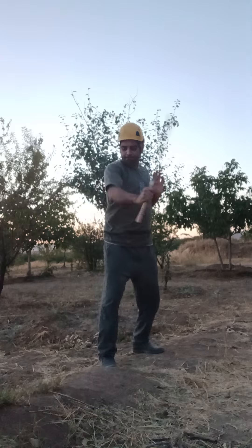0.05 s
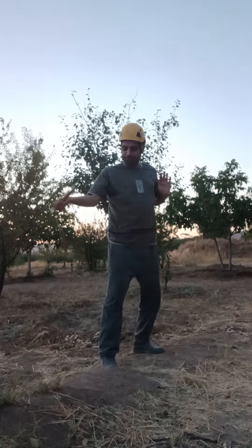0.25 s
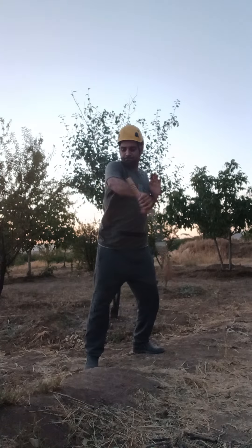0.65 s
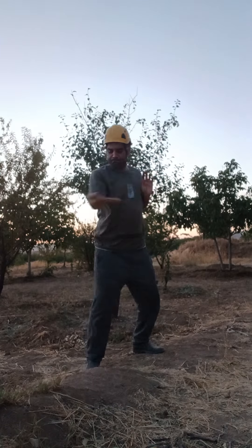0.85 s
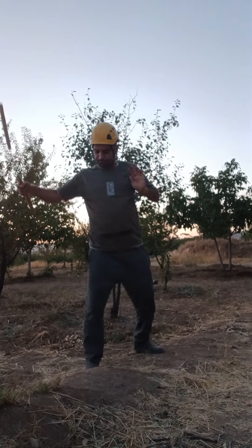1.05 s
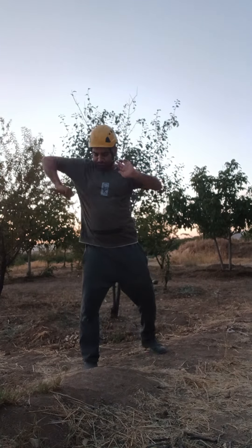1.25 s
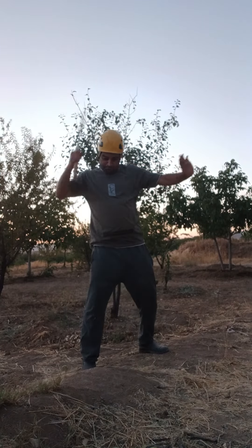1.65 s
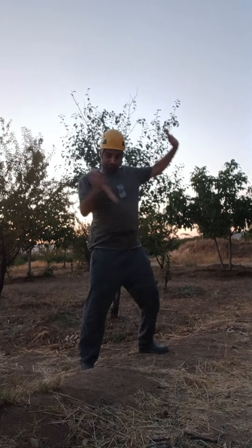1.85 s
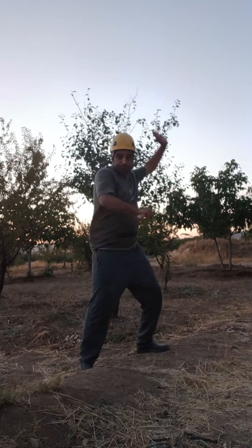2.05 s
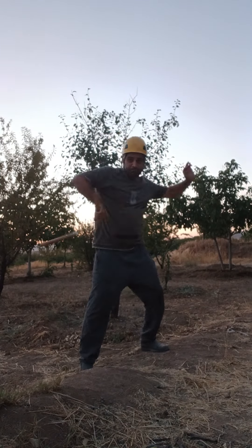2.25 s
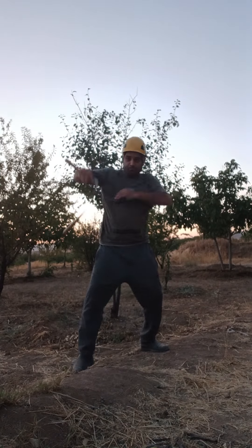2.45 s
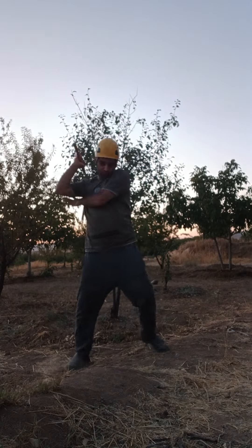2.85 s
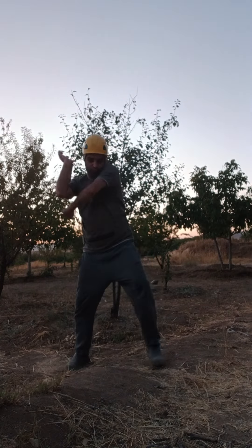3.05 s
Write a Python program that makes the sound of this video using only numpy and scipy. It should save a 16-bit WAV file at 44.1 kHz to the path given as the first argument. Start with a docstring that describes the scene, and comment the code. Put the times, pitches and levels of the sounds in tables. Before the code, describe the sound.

Short, uneven clacks and chain rattles come from a nunchaku being swung in the open air, with faint swishes as the sticks pass. Low wind buffets the microphone from side to side, then drops as the clacking ends.

```python
"""A nunchaku is swung and caught on dry ground outdoors. From the start, air hisses softly, a light
wind buffets each microphone port (opening) in turn, and the chain rattles. At once the sticks begin
to clack, each hit making them ring briefly, and a far insect starts chirping. Around half a second in,
the sticks swish through the air and the chain scrapes over one. At 1.4 s air whooshes across the right
port. The clacks go on until about 3 s, when the wind drops and a faint steady tone sounds."""
import sys
import numpy as np
from scipy import signal
from scipy.fft import rfft, irfft
from scipy.io import wavfile
from scipy.ndimage import uniform_filter1d

SR = 44100
rng = np.random.default_rng(int(sys.argv[2]) if len(sys.argv) > 2 else 0)


def file_out(sig):
    """Save sig as 16-bit WAV at sys.argv[1]."""
    # one column per channel
    cols = np.atleast_2d(sig).T
    # limit, then scale
    lim = np.clip(cols, -1, 1)
    pcm = np.round(lim * 32767).astype(np.int16)
    wavfile.write(sys.argv[1], SR, pcm)


N = 141120
T = np.arange(N) / SR
HZ = np.fft.rfftfreq(N, 1 / SR)


def amp(db):
    """Turns decibels into a number to multiply by."""
    return 10 ** (np.asarray(db) / 20)


def unit(x):
    """Scales a sound to an average (rms) level of 1."""
    return x / np.sqrt(np.mean(x ** 2) + 1e-20)


def bell(s, spread):
    """A smooth rise and fall that peaks at time s."""
    return np.exp(-.5 * ((T - s) / spread) ** 2)


def arch(s, length):
    """Half a sine wave that starts at time s."""
    return np.sin(np.pi * np.clip((T - s) / length, 0, 1))


def lowpass(x, hz):
    """Dulls a sound above the given frequency."""
    return signal.sosfilt(signal.butter(2, hz, fs=SR, output="sos"), x)


def noise(colour):
    """Noise shaped by rows of f/Hz, level/dB."""
    hz, db = np.transpose(colour)
    gain = amp(np.interp(np.log(HZ + 1), np.log(hz), db))
    return unit(irfft(rfft(rng.standard_normal(N)) * gain, N))


def steady(x, span_s):
    """Evens out the slow chance swells of a noise."""
    power = abs(signal.hilbert(x)) ** 2
    for _ in range(2):
        power = uniform_filter1d(power, int(span_s * SR))
    return unit(x / np.sqrt(abs(power) + 1e-9))


def echoes(x, fade_s):
    """Scattered reflections, different at each port, that drop 60 dB in fade_s."""
    t = T[:min(len(x), SR // 2)]
    taps = rng.standard_normal((2, len(t))) * amp(-60 * t / fade_s)
    taps /= np.linalg.norm(taps, axis=1, keepdims=True)
    return signal.fftconvolve(x[None], taps, axes=1)[:, :len(x)]


# How far the left port's wave runs ahead of the right's: f/Hz, phase/rad
LEFT_LEAD = [(0, -0.5), (2000, 1.3), (4400, 1.45), (7500, 2.5), (11000, 1.5), (15000, 4)]
def ports(x):
    """Makes a left and right pair; all but the low pitches reach the left a moment sooner."""
    phase = np.interp(np.fft.rfftfreq(len(x), 1 / SR), *np.transpose(LEFT_LEAD))
    return np.array([x, irfft(rfft(x) * np.exp(-1j * phase), len(x))])


# The colour (mix of low and high) of the open air: f/Hz, level/dB
AIR_COLOUR = [(30, 8), (250, 12.5), (550, -6.5), (1200, -5.5), (3000, -12), (8000, -34.5), (12000, -10.5),
              (16000, -15)]
def air():
    """A soft, even hiss, separate at each port."""
    return amp(-59.5) * np.array([noise(AIR_COLOUR), noise(AIR_COLOUR)])


# Wind strength: t/s, left level/dB, right level/dB
WIND_LEVELS = [(0, -49.5, -44.5), (0.119, -46.5, -48.5), (.3, -32, -51), (.4, -43.5, -31), (.62, -35, -54),
               (.75, -46.5, -37), (1.0, -39, -33.5), (1.25, -38, -30.5), (1.45, -48, -56),
               (1.6, -40, -34.5), (1.72, -39, -45), (1.82, -52, -28.5), (1.98, -30.5, -37),
               (2.24, -35, -28.5), (2.35, -49, -49.5), (2.418, -30, -31.5), (2.58, -36, -40.5),
               (2.72, -35, -32.5), (2.88, -51, -33), (2.95, -41.5, -43), (3.0, -71, -62), (3.2, -64, -48.5)]
# Sudden puffs: t/s, spread/s, level/dB, port (0 left, 1 right)
PUFFS = [(0.633, 0.017, -28, 0), (0.638, 0.035, -26.5, 1), (1.185, 0.025, -26, 1), (1.387, 0.009, -16.5, 1),
         (1.474, 0.036, -24, 1), (1.532, 0.017, -23.5, 1), (1.93, 0.022, -24.5, 0), (2.058, 0.011, -27, 1),
         (2.148, 0.012, -22, 0), (2.709, 0.023, -24.5, 1)]
# The colours of the rumble and the puffs: f/Hz, level/dB
RUMBLE_COLOUR = [(30, -36), (48, -9.5), (64, -2), (79, 4), (98, -6), (125, -16.5), (200, -33.5),
                 (400, -38.5), (1500, -106)]
PUFF_COLOUR = [(15, -50), (40, -8), (85, 10.5), (120, -2.5), (210, -18.5), (320, -32), (600, -40),
               (2000, -89)]
def wind():
    """Wind rumbles on each port separately, with short, brighter puffs."""
    times, *levels = np.transpose(WIND_LEVELS)
    out = np.zeros((2, N))
    for port in range(2):
        strength = amp(np.interp(T, times, levels[port]))
        puffs = sum(amp(db) * bell(s, spread) for s, spread, db, side in PUFFS if side == port)
        out[port] = steady(noise(RUMBLE_COLOUR), span_s=0.045) * strength
        out[port] += steady(noise(PUFF_COLOUR), span_s=0.026) * puffs
    return out


# The pitches (modes) at which sticks and chain ring, in four groups: f/Hz, width/Hz, level/dB
KNOCK = [(502, 136, -1.5), (957, 77, -4.5), (1264, 470, -3)]
MAIN_RING = [(2145, 470, -4.5), (2460, 140, -2), (2682, 320, -4)]
HIGH_RING = [(3764, 1030, -0.13), (4265, 157, -0.82), (4420, 370, -1.5)]
TICK = [(6305, 1330, 8.5), (7195, 2100, 9), (8600, 1370, 3.5), (12100, 1900, 1.5), (14300, 3400, -6)]
def ring(contacts, modes, detune=0):
    """Contacts set a group of modes ringing; detune shifts each pitch a little by chance."""
    out = 0
    for k, (hz, width, db) in enumerate(modes):
        hz *= 1 + detune * rng.uniform(-1, 1)
        ringing = signal.lfilter(*signal.iirpeak(hz, hz / width, SR), contacts)
        out += (-1) ** k * amp(db) * unit(ringing)
    band = [modes[0][0] * 0.6, modes[-1][0] * 1.23]
    return signal.sosfilt(signal.butter(2, band, "band", fs=SR, output="sos"), out)


# How loudly the chain jingles and clothes rustle: t/s, level/dB
RATTLE_LEVELS = [(0, -56.5), (.19, -75), (.25, -49.5), (.45, -68.5), (.63, -52), (.72, -62.5), (.98, -56.5),
                 (1.08, -67.5), (1.28, -61.5), (1.33, -51), (1.66, -55), (1.87, -56), (2.05, -49.5),
                 (2.28, -51.5), (2.34, -62), (2.43, -54), (2.73, -52), (2.88, -66), (2.97, -55), (3.2, -57)]
def rattle():
    """Chain links scuff and ring; near rest only a smooth, dry rustle is left."""
    links_per_s, scuff_s, rest_db = 330, .002, -62
    touches = rng.random(N) < links_per_s / SR
    strengths = amp(5 * np.minimum(rng.exponential(1, N), 3))
    scuffs = unit(signal.lfilter([1], [1, -np.exp(-1 / (scuff_s * SR))], touches * strengths))
    motion = amp(np.interp(T, *np.transpose(RATTLE_LEVELS)))
    loose = motion / (motion + amp(rest_db))  # near 0 at rest, near 1 when shaken
    rub = lambda: (loose * scuffs + 1 - loose) * rng.standard_normal(N)
    sound = 0
    for modes, db in (KNOCK, -7), (MAIN_RING, -0.5), (HIGH_RING, -6.5), (TICK, -9.5):
        sound += amp(db) * unit(ring(rub(), modes)) * (loose if modes is MAIN_RING else 1)
    return (sound + amp(-14) * rub()) * motion  # plain rubbing adds dry treble


# Stick hits: t/s, chatter length/s, main ring f/Hz, then level/dB of knock, main ring, high ring, tick
HITS = [(0.026, 0.0027, 2640, -54, -43.5, -40.5, -47.5), (0.048, 0.0039, 2600, -54, -50, -46, -56),
        (0.098, 0.0056, 2750, -58, -53.5, -64, -71), (0.2075, 0.005, 2330, -54, -43, -51, -57),
        (0.2173, 0.003, 2260, -45.5, -40, -38, -42.5), (0.226, 0.003, 2480, -51, -42, -52, -70),
        (0.235, 0.0058, 2170, -44, -46, -55, -76), (0.247, 0.0029, 2330, -62, -47, -47, -49.5),
        (0.5012, 0.0091, 2350, -47.5, -39.5, -51.5, -56.5), (0.5494, 0.0051, 2600, -42.5, -43, -50.5, -61),
        (0.59, 0.01, 2460, -43, -40, -67, -68), (0.5954, 0.0061, 2580, -62, -38.5, -47.5, -49),
        (0.6655, 0.001, 2600, -68, -66, -54, -59), (0.6824, 0.0019, 3060, -61, -47, -55, -63),
        (0.747, 0.005, 2440, -62, -48, -55, -70), (0.888, 0.0032, 2150, -50.5, -39.5, -53, -45),
        (0.897, 0.0045, 2960, -42.5, -40, -52, -53), (0.9402, 0.0026, 2300, -51, -44, -47, -51),
        (1.294, 0.0018, 2270, -57, -51.5, -56, -59), (1.311, 0.0026, 2100, -60, -43, -50, -54),
        (1.32, 0.0045, 2550, -49, -45, -52, -50), (1.333, 0.0032, 1980, -49, -40.5, -56, -50),
        (1.341, 0.0035, 1720, -44, -39.5, -49, -59), (1.408, 0.002, 2750, -58, -40.5, -56, -53.5),
        (1.439, 0.0037, 2460, -64, -45.5, -49.5, -56), (1.5046, 0.0037, 2320, -57, -41, -49, -53),
        (1.514, 0.0027, 2420, -50, -40, -43.5, -45.5), (1.564, 0.0021, 2330, -52, -41, -50, -53),
        (1.6013, 0.0031, 2460, -49, -29.5, -46, -58), (1.6444, 0.0044, 2630, -47, -39, -43.5, -54.5),
        (1.683, 0.0042, 2420, -52, -49, -48, -54.5), (1.764, 0.0015, 2390, -56, -46, -42, -50.5),
        (1.79, 0.0041, 2460, -42, -37, -39, -38), (1.7952, 0.0035, 2670, -41, -38.5, -47, -40.5),
        (1.806, 0.0013, 2470, -36, -49, -43, -52), (1.9355, 0.0027, 2670, -46.5, -48, -43.5, -49),
        (1.946, 0.0038, 2490, -47.5, -45, -54, -47.5), (1.993, 0.003, 2900, -49.5, -43, -43.5, -69),
        (2.0125, 0.00099, 2460, -54, -35, -30, -43), (2.022, 0.0038, 2260, -45, -38, -43, -51),
        (2.053, 0.006, 2850, -37, -40, -36.5, -44.5), (2.07, 0.0015, 2090, -64, -48, -41.5, -51),
        (2.1006, 0.0031, 2360, -46, -45.5, -45, -49), (2.155, 0.00086, 2450, -69, -56, -48, -66),
        (2.178, 0.0047, 2400, -50, -35, -41, -51), (2.188, 0.008, 2320, -42, -41, -42.5, -49),
        (2.2236, 0.0015, 2475, -54, -37.5, -48, -56), (2.229, 0.00099, 2400, -46.5, -43, -45.5, -57),
        (2.242, 0.0042, 2370, -42, -46, -43.5, -48.5), (2.269, 0.021, 2780, -46, -41, -49.5, -72),
        (2.365, 0.0015, 2420, -55, -51, -44, -51), (2.388, 0.0029, 2230, -42.5, -34, -33, -38),
        (2.4745, 0.0014, 2420, -47.5, -46, -48.5, -49.5), (2.5056, 0.0042, 2730, -55, -45, -47.5, -58),
        (2.515, 0.00093, 2790, -57, -68, -64, -52), (2.558, 0.0044, 2470, -58.5, -44, -48, -56),
        (2.642, 0.003, 2680, -44, -41, -43, -39), (2.6843, 0.0039, 2570, -43.5, -38, -52.5, -55),
        (2.7144, 0.011, 2570, -54, -39.5, -64, -55), (2.796, 0.00096, 2460, -75, -40, -54.5, -54.5),
        (2.9311, 0.0036, 2580, -43.5, -39, -38.5, -36.5), (2.9423, 0.0037, 2590, -49, -37.5, -47, -46),
        (3.053, 0.0011, 2470, -78, -47.5, -67, -48.5)]
def clacks():
    """Each clack is one contact and a quick chatter, and rings at slightly different pitches."""
    contacts_per_s, pitch_scatter, main_ring_hz = 3500, 0.049, 2460
    out, t = np.zeros((2, N)), T[:2048]
    lead = 64  # silent samples before the hit
    for s, length, pitch_hz, *levels in HITS:
        contacts = rng.standard_normal(len(t)) * (rng.random(len(t)) < contacts_per_s / SR)
        contacts *= np.exp(-0.39 * (t / max(length, 1e-3)) ** 2)
        contacts[0] = 1.2  # the first contact
        contacts = np.roll(contacts, lead)
        shifted_ring = [(hz * pitch_hz / main_ring_hz, width, db) for hz, width, db in MAIN_RING]
        sound = amp(levels[-1] - 5) * ports(unit(contacts))  # dry crack, 5 dB below the tick
        for modes, db in zip((KNOCK, shifted_ring, HIGH_RING, TICK), levels):
            ringing = ring(contacts, modes, 0 if modes is shifted_ring else pitch_scatter)
            bounce = amp(-2) * echoes(ringing, fade_s=0.018)  # off the body and the ground
            sound += amp(db) * unit(ports(ringing) + bounce)
        sound *= np.sqrt(.01 * SR / len(t))  # levels count as if the clack lasted 10 ms
        start = round(s * SR) - lead
        out[:, start:start + len(t)] += sound
    return out


def insect():
    """A far insect chirps at an even pace: a thin, high buzz that flutters."""
    pitch_hz, width_hz, flutters_per_s, every_s = 6440, 260, 27, .51
    band = np.exp(-((HZ - pitch_hz) / width_hz) ** 2)
    buzz = unit(irfft(rfft(rng.standard_normal(N)) * band, N))
    flutter = unit(abs(np.sin(np.pi * flutters_per_s * T)))
    chirps = sum(np.sqrt(arch(s, length=.17)) for s in np.arange(.135, 2.97, every_s))
    return amp(-70) * buzz * flutter * chirps


# Swings of the sticks: t/s, spread/s, level/dB
SWINGS = [(0.478, 0.069, -55.5), (0.583, 0.011, -53.5), (0.811, 0.022, -52), (1.34, 0.019, -56),
          (1.432, 0.03, -52.5), (1.835, 0.012, -51.5), (2.007, 0.049, -53), (2.254, 0.026, -53.5),
          (2.624, 0.052, -55), (3.167, 0.0097, -49.5)]
# The colour of a swish: f/Hz, level/dB
SWISH_COLOUR = [(100, -39), (300, -1.5), (520, -4.5), (750, -8), (1100, -6.5), (1800, -10.5), (3000, -27.5)]
def swishes():
    """Air noise swells and fades as a stick passes."""
    power = sum((amp(db) * bell(s, spread)) ** 2 for s, spread, db in SWINGS)
    return noise(SWISH_COLOUR) * np.sqrt(power)


def glide(s, length, from_hz, to_hz, width_hz, db):
    """A narrow band of noise slides in pitch as it swells and fades."""
    pitch_hz = np.interp(T, [s, s + length], [from_hz, to_hz])
    blur = lowpass(rng.standard_normal(N) + 1j * rng.standard_normal(N), width_hz / 2)
    band = (blur * np.exp(2j * np.pi * np.cumsum(pitch_hz) / SR)).real  # lifts the noise to the pitch
    return amp(db) * arch(s, length) * steady(band, span_s=0.0074)


# Chain scrapes: t/s, length/s, first f/Hz, last f/Hz, width/Hz, level/dB
CHAIN_SCRAPES = [(0.546, 0.04, 2600, 2630, 160, -48), (0.584, 0.054, 2450, 3034, 300, -47),
                 (0.623, 0.02, 2900, 4560, 600, -48.5), (1.297, 0.067, 580, 473, 110, -50),
                 (1.36, .035, 2680, 2370, 200, -53), (1.43, 0.02, 950, 994, 60, -47.5),
                 (2.177, .014, 2560, 2405, 150, -37)]
def scrapes():
    """The chain drags over a stick and makes it sing."""
    return sum(glide(*row) for row in CHAIN_SCRAPES)


# One low rush of air: t/s, length/s, first f/Hz, last f/Hz, width/Hz, level/dB
AIR_RUSH = (1.41, .11, 210, 180, 105, -30)
def whoosh():
    """Air blows across the right port only."""
    return np.outer([0, 1], glide(*AIR_RUSH))


# The tone's harmonics (1, 2, 3... times its pitch): level/dB
HARMONICS = [-63, -88, -62.5, -68.5, -78]
def far_tone():
    """A faint, far tone swells and fades on one steady pitch."""
    pitch_hz = 255
    tone = sum(amp(db) * np.sqrt(2) * np.sin(2 * np.pi * (k * pitch_hz * T + rng.random()))
               for k, db in enumerate(HARMONICS, 1))
    return tone * arch(2.97, length=0.18)


def scene():
    """The nunchaku in front of the two ports, in open air."""
    rustle = lambda: rattle() + swishes()
    scattered = amp(-6) * np.array([rustle(), rustle()])  # reaches each port on its own
    nunchaku = clacks() + ports(rustle() + scrapes()) + scattered
    tree_echo = amp(-12) * echoes(lowpass(nunchaku[0], hz=4530), fade_s=0.16)
    heard = air() + nunchaku + tree_echo + insect() + far_tone()
    balance = amp([[-0.56], [2]])  # left, right
    return heard * balance + wind() + whoosh()


def record(dry):
    """Trims away the deepest rumble and the highest treble."""
    lowest_hz, highest_hz = 36, 16200
    trimmed = signal.sosfilt(signal.butter(2, lowest_hz, "high", fs=SR, output="sos"), dry)
    treble_cut = signal.firwin(511, highest_hz, window=("kaiser", 9), fs=SR)
    return signal.oaconvolve(trimmed, treble_cut[None], "same")


dry = scene()
out = record(dry)
file_out(out)
```